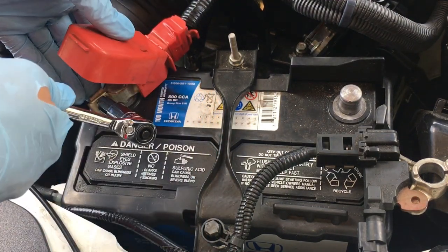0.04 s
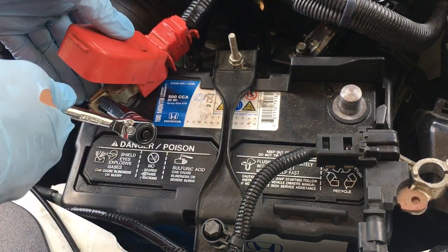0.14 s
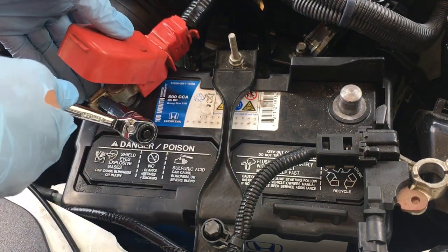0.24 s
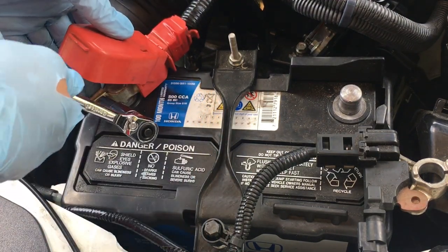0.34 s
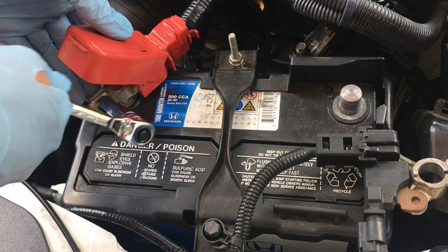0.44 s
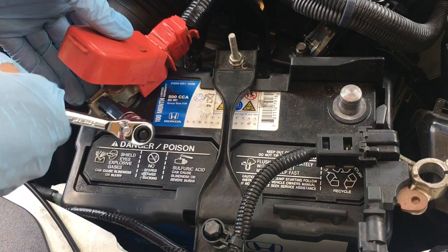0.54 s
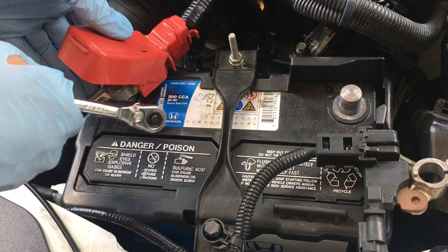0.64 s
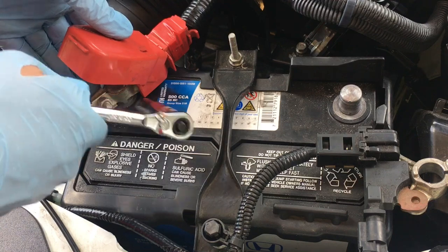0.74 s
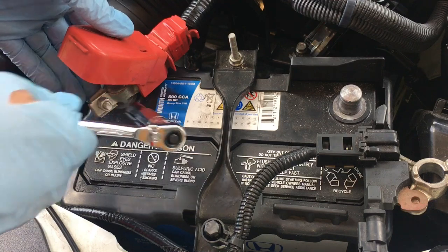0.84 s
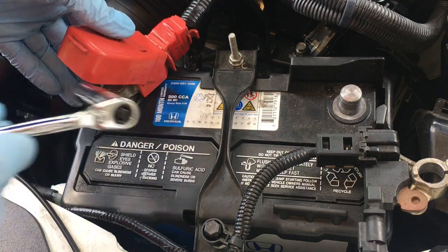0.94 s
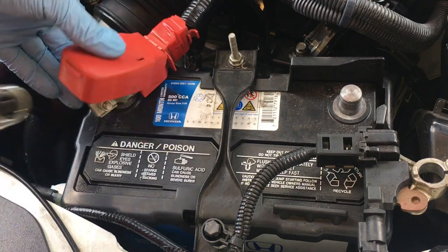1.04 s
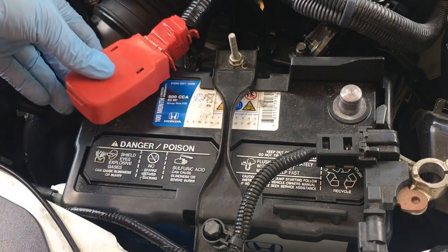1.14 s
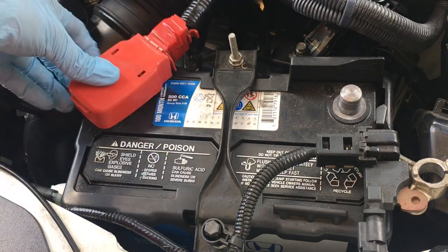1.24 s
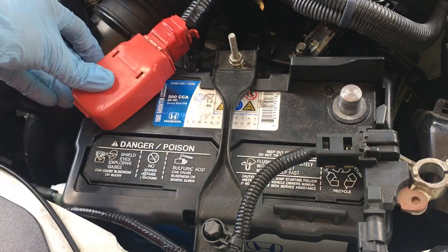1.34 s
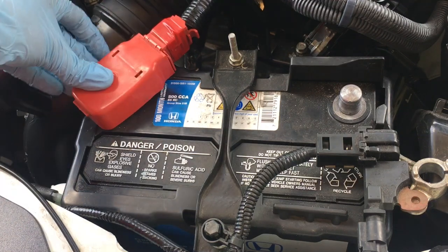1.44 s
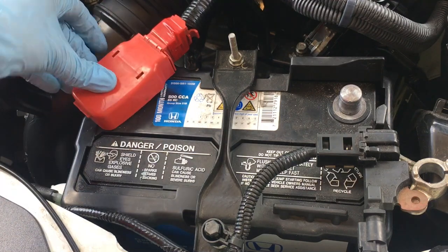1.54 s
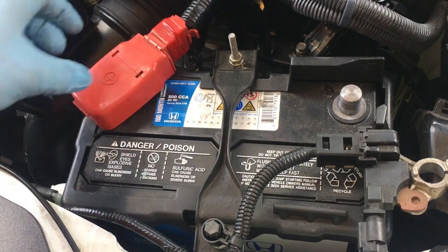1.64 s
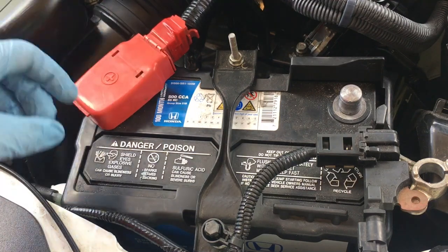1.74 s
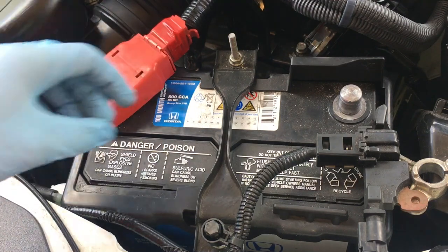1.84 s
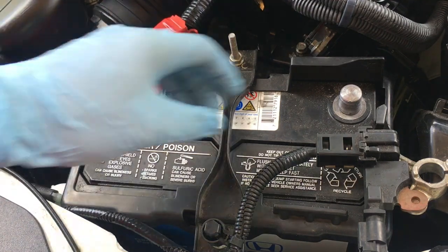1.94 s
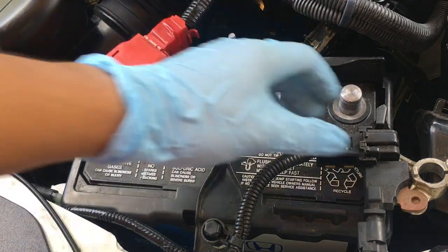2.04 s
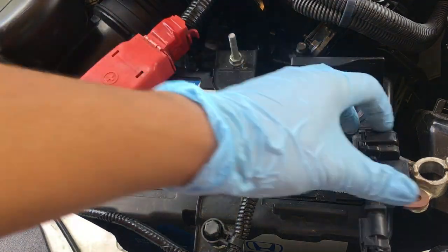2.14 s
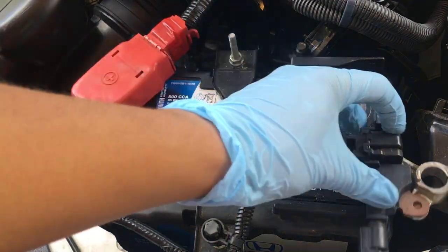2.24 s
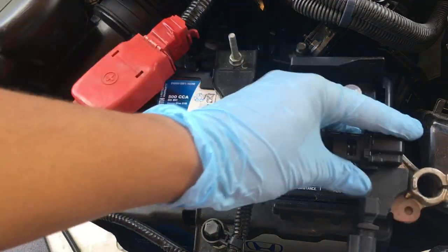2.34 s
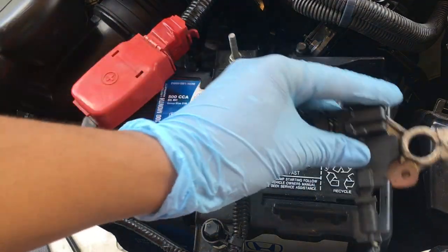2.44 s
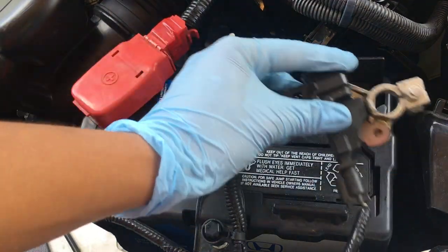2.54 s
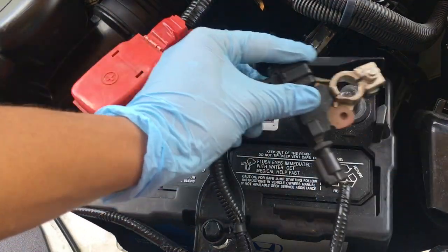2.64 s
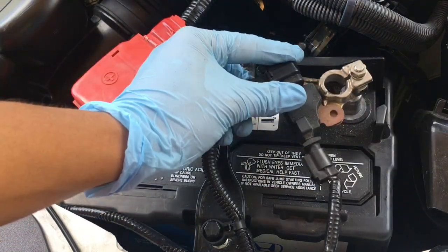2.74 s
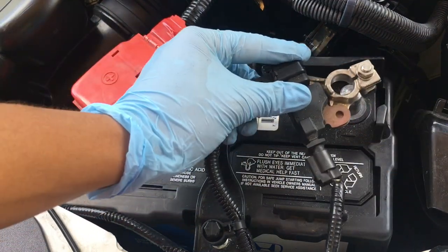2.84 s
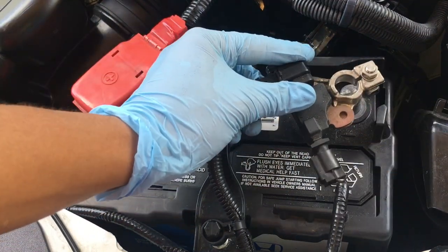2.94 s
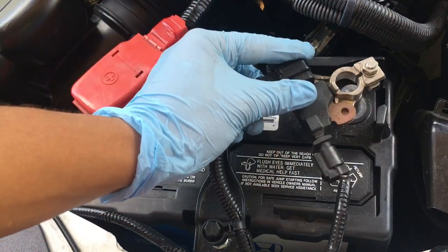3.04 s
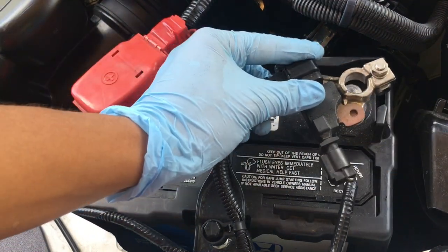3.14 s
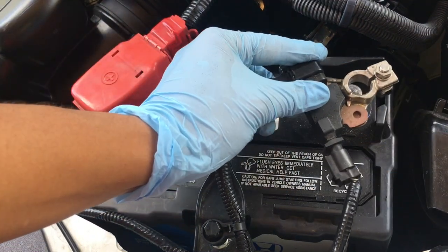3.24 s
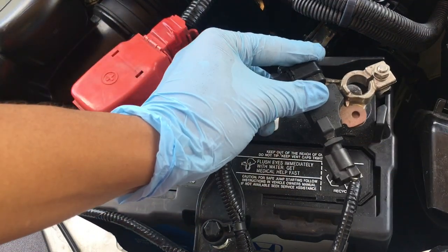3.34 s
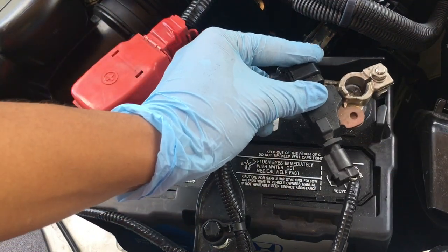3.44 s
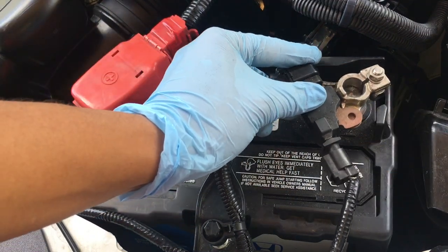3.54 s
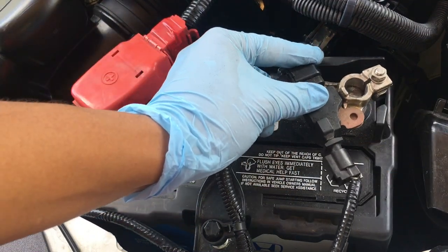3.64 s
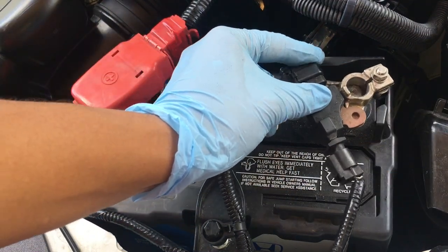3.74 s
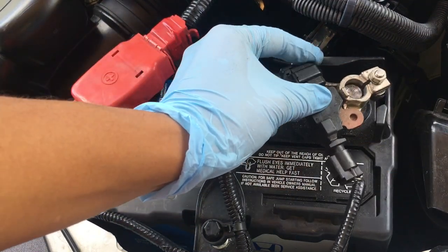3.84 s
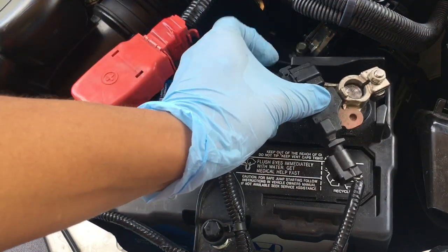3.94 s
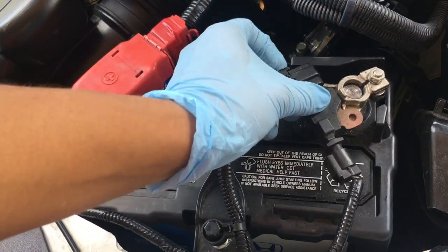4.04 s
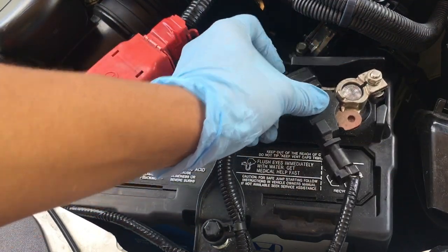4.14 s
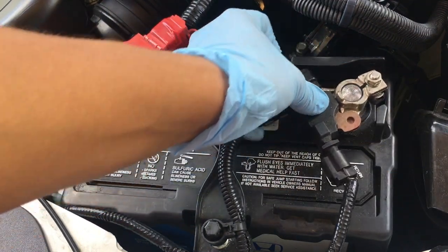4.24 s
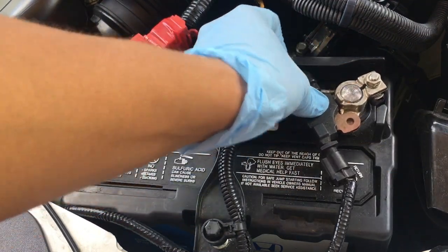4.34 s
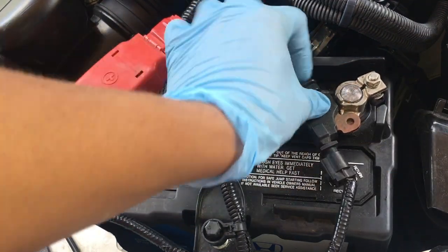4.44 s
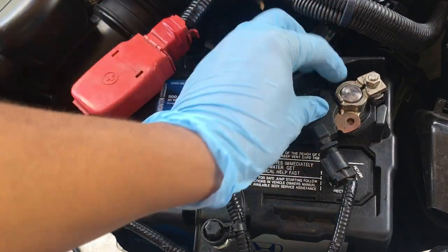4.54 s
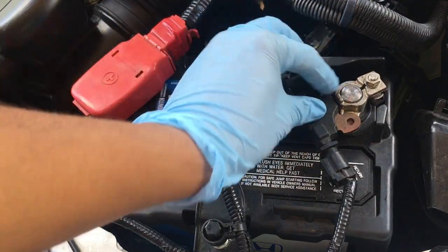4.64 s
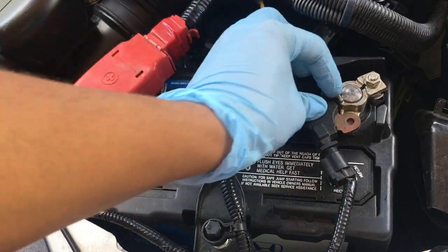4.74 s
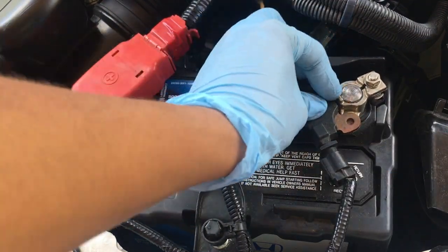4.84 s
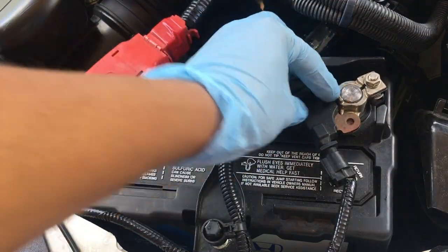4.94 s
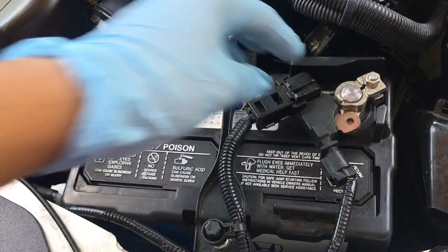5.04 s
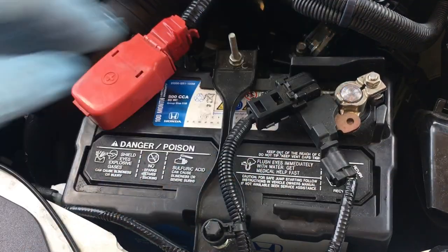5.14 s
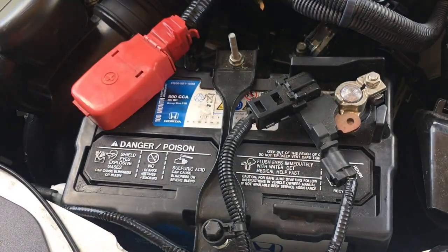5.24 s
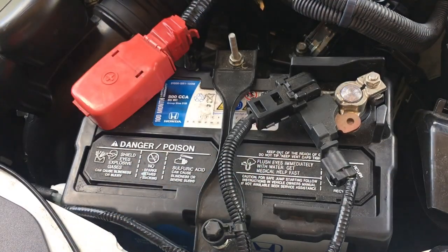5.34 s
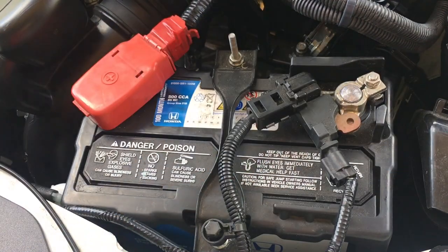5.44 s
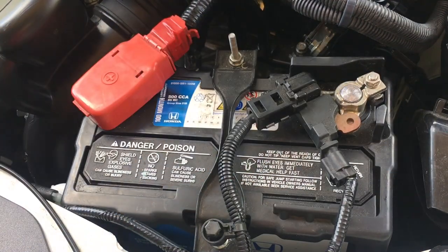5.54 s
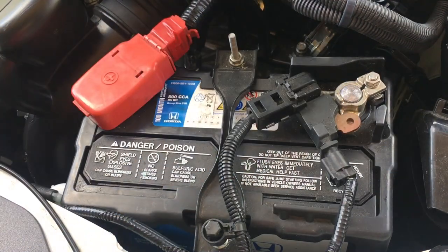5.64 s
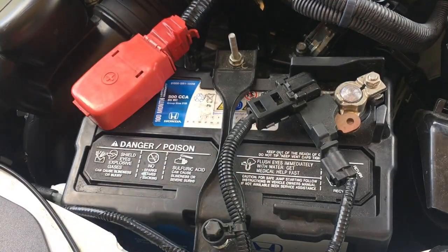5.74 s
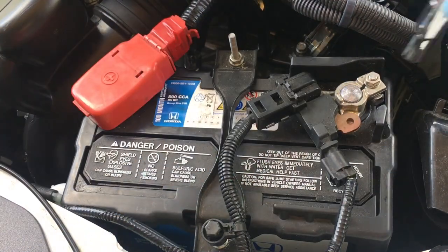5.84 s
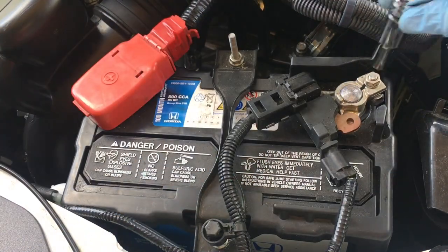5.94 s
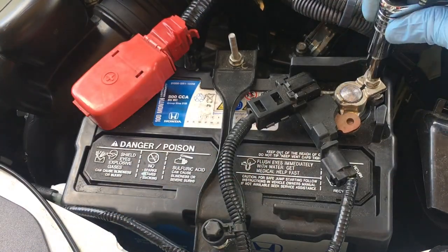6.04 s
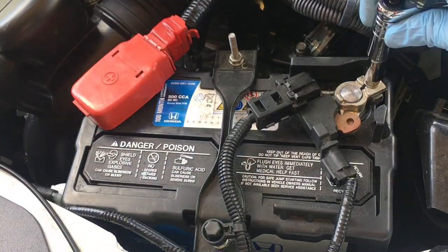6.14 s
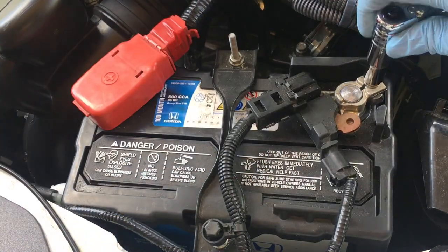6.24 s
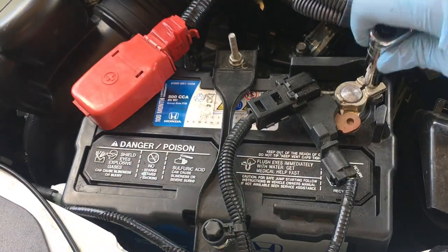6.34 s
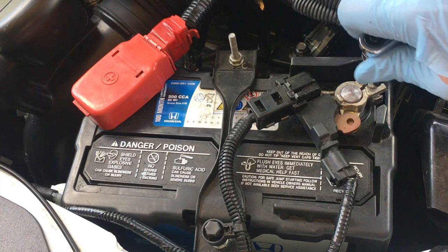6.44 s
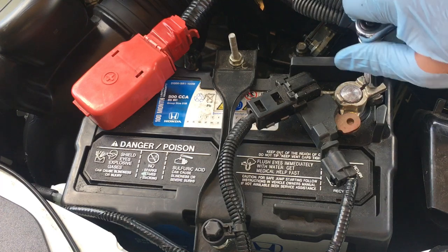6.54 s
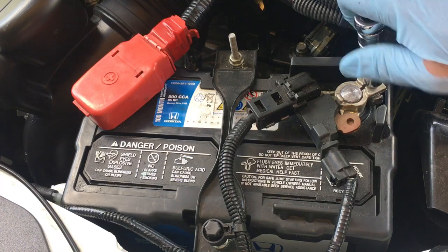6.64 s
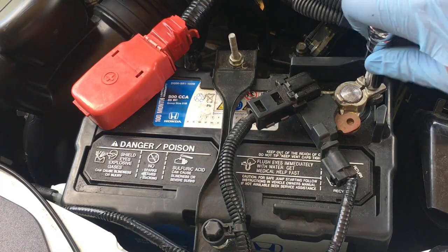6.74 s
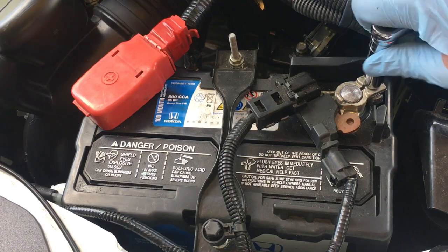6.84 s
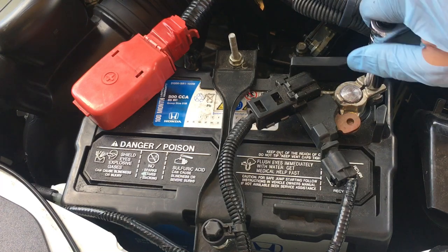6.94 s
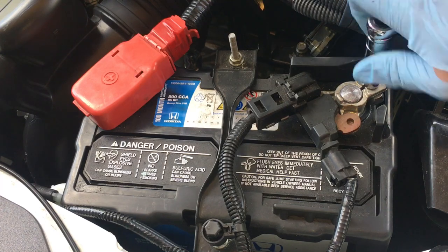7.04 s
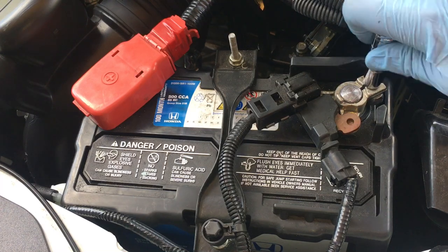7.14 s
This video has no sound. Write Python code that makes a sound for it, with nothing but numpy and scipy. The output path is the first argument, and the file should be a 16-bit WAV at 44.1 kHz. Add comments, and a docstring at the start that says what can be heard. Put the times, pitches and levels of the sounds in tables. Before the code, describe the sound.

Close sound of hands working on a car battery in an open engine bay. A faint low hum and soft rubber-glove rustle run throughout. A spanner lifts off with a clack, then a plastic cover snaps shut, by far the loudest event. Cable and clamp parts knock and tick as the clamp is set on its post. Small metal taps follow, then a ratchet clicks in two fast runs.

```python
"""A distant low hum with a faint whine is heard first, under a soft rustle of gloves; both last throughout.
Hands work on a car battery in an open engine bay: a spanner is lifted off, a plastic cover snaps shut,
a clamp is set on its post, and a socket ratchet clicks back in two short runs.
Hum and rustle are shaped noise, the hum with two sine tones; slides and ticks are noise through resonances;
knocks are forces ringing modes; cover and ratchet add bursts of shaped noise to such rings.
A short dense tail gives the reflections of the bay."""
import sys
import numpy as np
from scipy import signal
from scipy.fft import rfft, irfft
from scipy.io import wavfile

SR = 44100
rng = np.random.default_rng(int(sys.argv[2]) if len(sys.argv) > 2 else 0)


def store_wav(level_fs):
    """Save 16-bit WAV to argv[1]."""
    pcm = np.round(np.clip(np.atleast_2d(level_fs), -1, 1) * 32767)
    wavfile.write(sys.argv[1], SR, pcm.T.astype(np.int16))


N = 317520   # samples, 7.2 s


def from_db(db):
    """Logarithmic level: decibels to amplitude gain."""
    return 10 ** (np.asarray(db) / 20)


def rms_one(x):
    """Normalisation by mean square: scales the signal to rms 1."""
    return x / np.sqrt(np.mean(x ** 2) + 1e-20)


def in_time(rows):
    """Linear interpolation: a (t/s, value) curve at every sample."""
    s, value = np.transpose(rows)
    return np.interp(np.arange(N) / SR, s, value)


def drift(rate_hz):
    """Low-passed chance of rms 1: coarse noise through two equal one-pole filters."""
    step = 40   # samples between coarse points
    pole = np.exp(-2 * np.pi * rate_hz * step / SR)
    settling = 2000   # coarse points discarded while the filter settles
    noise = rng.standard_normal(N // step + settling + 2)
    slow = signal.lfilter([1], [1, -2 * pole, pole * pole], noise)[settling:]
    return np.interp(np.arange(N) / step, np.arange(len(slow)), rms_one(slow))


def coloured(spectrum, size=N):
    """Spectral shaping: white noise weighted by (f/Hz, level/dB) points on a log frequency axis, rms 1."""
    hz = np.arange(size // 2 + 1) * SR / size + 1   # +1 keeps the logarithm finite
    point_hz, point_db = np.transpose(spectrum)
    gain = from_db(np.interp(np.log(hz), np.log(point_hz), point_db))
    return rms_one(irfft(rfft(rng.standard_normal(size)) * gain, size))


def fading(t60):
    """Exponential decay: a contact builds up quickly and dies away, in an envelope 0.25 s long."""
    t = np.arange(SR // 4) / SR
    t60 = max(t60, 1e-3)
    rise = np.minimum(t / (0.022 * t60), 1)
    return rise * from_db(-60 * t / t60) + 1e-18


def contact(t60, blow=0):
    """Impulsive excitation: a contact force of a first blow and a fading burst of noise."""
    force = rng.standard_normal(SR // 4) * fading(t60)
    force[0] += blow
    return force


def struck(force, modes, gains_db):
    """Modal superposition: the force rings each damped resonance, scaled to that mode's peak."""
    out = 0
    for (hz, level_db, t60), gain_db in zip(modes, gains_db):
        radius = from_db(-60 / (t60 * SR))
        angle = 2 * np.pi * hz / SR
        ring = signal.lfilter([1, 0, -1], [1, -2 * radius * np.cos(angle), radius * radius], force)
        out = out + from_db(level_db + gain_db) * ring / np.max(np.abs(ring))
    return out


def add(track, s, peak_db, sound):
    """Linear superposition: lays a sound on the track at its time and peak level."""
    at = round(s * SR)
    part = sound[:N - at]
    track[at:at + len(part)] += from_db(peak_db) * part / np.max(np.abs(sound))


def hum():
    """Broadband rumble with tonal components: far machinery, with two faint tones wavering in pitch and level."""
    # spectrum of the rumble: f/Hz, relative level/dB per Hz
    rumble_tone = [(13, -60), (28, -34), (45, -5.5), (63, 1), (123, -4), (170, -12.5), (300, -12),
                   (400, -18), (460, -25.5), (580, -22.5), (1300, -28), (2900, -39), (6400, -45),
                   (10500, -61), (16500, -59)]
    # wavering tones: mean f/Hz, central rms level/dB
    whines = [(121, -58.5), (933, -68.5)]
    out = from_db(-44.5) * coloured(rumble_tone)
    for hz, level_db in whines:
        phase = 2 * np.pi * hz * np.cumsum(1 + 0.00196 * drift(1.67)) / SR
        level = from_db(level_db + 2.2 * drift(1.2))
        out = out + np.sqrt(2) * level * np.sin(phase)   # root 2: rms to peak of a sine
    return out


def bay(x):
    """Diffuse reverberation: metal and plastic of the engine bay reflect a short, dull, dense tail."""
    t60_s, build_up_s, cut_hz = .16, 0.027, 5000
    t = np.arange(SR // 3) / SR
    tail = rng.standard_normal(len(t)) * from_db(-60 * t / t60_s) * np.minimum(t / build_up_s, 1)
    tail = signal.lfilter(*signal.butter(1, cut_hz, fs=SR), tail)
    unit_energy_tail = tail / np.sqrt(np.sum(tail ** 2))
    return signal.fftconvolve(x, unit_energy_tail)[:N]


def rustle():
    """Friction noise: rubbing flutters, swells smoothly and crackles at random as the rubber unsticks."""
    # slow level of the rubbing before flutter and crackle: t/s, level/dB
    slow_level = [(0, -69.5), (.45, -70.5), (.62, -62.5), (1.03, -63.5), (1.07, -70.5), (1.5, -59.5),
                  (2.05, -69.5), (2.42, -60.5), (2.7, -72), (3.55, -70), (3.85, -59.5), (4.1, -64.5),
                  (4.9, -67), (5.9, -68), (6.4, -67), (6.6, -62), (7.2, -60)]
    # spectrum of the rubbing: f/Hz, relative level/dB per Hz
    rub_tone = [(590, -38), (1000, -6), (2380, -3), (2940, -13), (3720, -7), (5000, -14.5), (6200, -8.5),
                (10400, -15.5), (13000, -15), (15900, -22), (16500, -67)]
    # swells of the soft noise: glove or sleeve brushes, and a hiss under the first ratchet run:
    # t/s of the loudest moment, added level/dB there, length/s
    swells = [(1.82, -57, 0.08), (2.258, -78, 0.05), (2.644, -67, 0.065), (2.788, -61, 0.051),
              (3.905, -60, 0.063), (3.994, -53.5, .05), (4.219, -56.5, 0.045), (4.352, -58.5, .07),
              (4.5, -55.5, 0.12), (4.641, -63.5, 0.072), (4.79, -62, 0.084), (5.046, -72, 0.19),
              (5.368, -61, 0.063), (5.453, -66, 0.13), (5.743, -70, 0.16), (6.125, -57.5, 0.29),
              (6.518, -43.5, 0.18)]
    crackles_per_s, crackle_t60_s, crackle_max_db = 18, .012, 8   # tallest pop, relative to the rubbing

    t = np.arange(N) / SR
    level = from_db(in_time(slow_level))
    for s, level_db, length in swells:
        rise_and_fall = np.cos(np.pi * np.clip((t - s) / length, -.5, .5)) ** 2
        level = level + from_db(level_db) * rise_and_fall
    happens = rng.random(N) < crackles_per_s / SR
    pops = happens * from_db(crackle_max_db) * rng.random(N)
    crackle = 1 + signal.lfilter([1], [1, -from_db(-60 / (crackle_t60_s * SR))], pops)
    flutter = from_db(0.87 * drift(61.0))
    return level * crackle * flutter * coloured(rub_tone)


def slides():
    """Resonant filtering: friction noise swells and fades through the resonance of the part that slides."""
    # short slides: t/s of the start, length/s, centre f/Hz, bandwidth/Hz, rms level/dB before the fades
    rubs = [(0.741, 0.036, 1250, 1280, -45), (1.144, 0.1, 2150, 400, -60.5),
            (1.294, 0.046, 1942, 200, -48.5), (1.325, 0.016, 6000, 3000, -58),
            (2.393, 0.056, 650, 300, -44), (2.413, .022, 11800, 500, -56), (4.618, 0.28, 1490, 1770, -59.5),
            (5.649, 0.047, 1500, 1480, -56), (5.996, 0.1, 5870, 1190, -61.5),
            (6.064, 0.11, 3930, 1200, -55)]
    out = np.zeros(N)
    for s, length, hz, width_hz, level_db in rubs:
        at, size = round(s * SR), round(length * SR)
        noise = rng.standard_normal(SR // 2)
        rub = signal.lfilter(*signal.iirpeak(hz, hz / width_hz, SR), noise)[-size:]   # settled end
        out[at:at + size] += from_db(level_db) * rms_one(rub) * signal.windows.tukey(size, .5)
    return out


def ticks():
    """Broadband contact with one resonance: a bright crack has a broad peak where the small part rings."""
    # small ticks of metal parts, cable and glove: t/s, peak level/dB, f/Hz of the ring,
    # level/dB of the broad crack's gain relative to the ring's
    small_hits = [(.628, -24, 11100, -8), (0.7482, -24.5, 8650, -23), (.765, -40, 3820, -6),
                  (1.804, -50, 6530, -8), (1.983, -47, 4100, -3), (2.2396, -41.5, 6000, -17),
                  (2.337, -42, 4500, -6), (2.365, -35, 11900, -16), (2.3778, -30, 4270, -19),
                  (2.386, -24, 12600, -3), (2.4346, -35.5, 11900, -13), (2.4424, -42, 3860, -14),
                  (2.4485, -32.5, 6400, -8), (2.4567, -30.5, 3900, -4), (2.748, -47, 3950, -17),
                  (2.7892, -34, 8140, -2), (2.831, -33.5, 6750, -8), (3.0332, -46, 4440, -4),
                  (3.6303, -29.5, 6170, -9), (3.852, -40.5, 6890, 7), (3.8843, -23.5, 8700, 7),
                  (3.897, -30, 6660, 1), (3.9085, -30.5, 7700, 1), (4.0004, -40, 5210, -21),
                  (4.474, -44, 3520, -15), (4.5085, -35.5, 3680, -11), (5.468, -37, 5570, 0),
                  (5.7305, -44.5, 3770, -3), (6.1275, -34, 3860, -28), (6.144, -23.5, 6250, 3),
                  (6.1798, -32, 6240, -9), (6.191, -39, 3820, -11), (6.2814, -31.5, 12000, -8),
                  (6.7894, -33.5, 6000, 1), (6.8508, -34.5, 5160, -20)]
    out = np.zeros(N)
    bright = signal.butter(2, [2300, 13500], "band", fs=SR, output="sos")
    for s, peak_db, hz, crack_db in small_hits:
        force = contact(.017)
        ring = signal.lfilter(*signal.iirpeak(hz, 4.0, SR), force)
        add(out, s, peak_db, signal.sosfilt(bright, from_db(crack_db) * force + ring))
    return out


def knocks():
    """Modal excitation by position: where the slightly soft blow lands decides which modes speak most."""
    # knocks on the battery case and clamp: t/s, peak level/dB, f/Hz favoured by the blow
    blows = [(0.6307, -38, 1910), (0.676, -41, 2570), (0.732, -39, 1500), (0.7483, -16, 1820),
             (.754, -30.5, 820), (.766, -26.5, 1800), (.771, -30, 820), (2.337, -44, 1750),
             (2.378, -32, 2160), (2.3858, -16, 1140), (2.392, -21, 1250), (2.421, -33, 640),
             (2.458, -39.5, 2320), (2.784, -34, 1280), (3.631, -39.5, 730), (3.8897, -18.5, 1210),
             (3.899, -27, 905), (4.055, -38, 1030), (4.221, -44, 1050), (4.507, -36, 1714),
             (5.133, -37, 1860), (5.354, -37, 734), (5.648, -30, 1270), (6.129, -26.5, 2300),
             (6.1294, -23.5, 980), (6.154, -34.5, 940), (6.183, -31.5, 3060), (6.228, -34, 2140),
             (6.285, -31, 2840), (6.51, -35, 880), (6.79, -30.5, 2760)]
    # modes of the battery case: f/Hz, relative level/dB, t60/s
    case = [(450, -12, .035), (590, -3, .045), (730, -2, .04), (870, -3, .035), (1010, -2, .035),
            (1140, 0, .04), (1400, -4, .035), (1550, -3, .03), (1750, -2, .025), (1950, -3, .02),
            (2280, -2, .02), (2560, -6, .018), (3140, -5, .012), (3700, -8, .01)]
    out = np.zeros(N)
    mode_hz = np.array(case)[:, 0]
    for s, peak_db, hz in blows:
        octaves_away = np.abs(np.log2(mode_hz / hz))
        gains_db = -16 * octaves_away + rng.normal(0, 1.5, len(case))
        contact_t60_s = 0.025 * (hz / 1000) ** -0.5   # higher knocks have shorter contacts
        sound = struck(contact(contact_t60_s, blow=5), case, gains_db)
        softened = signal.lfilter(*signal.butter(2, 1.5 * hz, fs=SR), sound)
        add(out, s, peak_db, softened)
    return out


def cover():
    """Fixed modes of a hollow body: every snap rings the same set, under a dry crack and a loose rattle."""
    # plastic cover flexing and snapping: t/s, peak level/dB, contact t60/s
    snaps = [(1.325, -41, 0.02), (1.357, -32, 0.0044), (1.381, -45, 0.018), (1.399, -12.5, 0.006),
             (1.4031, -2, 0.022), (1.698, -36, 0.0067)]
    # modes of the cover: f/Hz, relative level/dB, t60/s
    cover_modes = [(600, -21, .04), (870, -12, .045), (1400, -9, .05), (1530, -11, .06), (1800, -6, .015),
                   (1930, 0, .016), (2200, -7, .02), (2600, -13, .02), (2920, -15, .025), (3750, -11, .015),
                   (4350, -14, .015)]
    # spectrum of the crack: f/Hz, relative level/dB per Hz
    crack_tone = [(500, -23), (2000, -10.5), (5000, -39), (11000, -21), (16000, -52)]
    out = np.zeros(N)
    for s, peak_db, contact_s in snaps:
        force = contact(contact_s, blow=1.3)
        rings = struck(force, cover_modes, rng.normal(0, 1, len(cover_modes)))
        crack_then_rattle = fading(2 * contact_s) + from_db(-19.0) * fading(0.094)
        crack = coloured(crack_tone, size=SR // 4) * crack_then_rattle
        add(out, s, peak_db, rings + from_db(-7) * crack)
    return out


def ratchet():
    """High modal density: each pawl drop is a broad crack over a few head rings, its colour and strength
    scattered at random from click to click."""
    # the pawl drops over a ratchet tooth: t/s
    pawl_drops = [6.4327, 6.4456, 6.4651, 6.4758, 6.4819, 6.4942, 6.4995, 6.5041, 6.5116, 6.5215, 6.5284,
                  6.5323, 6.5363, 6.5418, 6.5506, 6.5563, 6.5671, 6.5725, 6.5771, 6.5813, 6.5911, 6.598,
                  6.6068, 6.616, 6.6228, 6.6321, 6.6503, 6.8829, 6.9457, 6.9571, 6.961, 6.9697, 6.9728,
                  6.9824, 6.9976, 7.0086, 7.0202, 7.0292]
    # strength along the two back-swings of the handle: t/s, peak level/dB before scatter
    swing = [(6.43, -19), (6.465, -14), (6.512, -13), (6.526, -21), (6.55, -19), (6.557, -14), (6.65, -13),
             (6.88, -21), (6.945, -19), (6.97, -17), (7.03, -15.5)]
    # modes of the steel head: f/Hz, relative level/dB before scatter, t60/s
    head = [(3460, -22.5, 0.075), (5870, -11, 0.016), (6110, -3, 0.018), (6900, -6.5, 0.019),
            (8700, -20, 0.0089), (9030, -20, 0.018), (8870, 5, 0.0042), (10960, -0.5, 0.016)]
    # mean spectrum of the crack: f/Hz, relative level/dB per Hz
    click_tone = [(470, -38), (800, -12.5), (1510, -10), (3610, -7.5), (6070, 1), (7530, -7), (9220, 4.5),
                  (13800, -3.5), (15300, 1.5), (16500, -6.5)]
    level_scatter_db, colour_scatter_db, ring_scatter_db = 1.0, 2.5, 5   # standard deviations per click

    out = np.zeros(N)
    sharp_then_chatter = fading(.005) + from_db(-8) * fading(.022) + from_db(-31) * fading(.2)
    for s in pawl_drops:
        peak_db = np.interp(s, *np.transpose(swing)) + level_scatter_db * rng.standard_normal()
        tone = [(hz, db + colour_scatter_db * rng.standard_normal()) for hz, db in click_tone]
        crack = coloured(tone, size=SR // 4) * sharp_then_chatter
        rings = struck(contact(.004), head, rng.normal(0, ring_scatter_db, len(head)))
        add(out, s, peak_db, crack + from_db(-11) * rings)
    return out


def scene():
    """Direct and diffuse sound: all hits and slides share the bay; rustle and hum are already diffuse."""
    near = ratchet() + cover() + knocks() + ticks() + slides()
    reflections = from_db(-24) * bay(near)
    return (near + reflections + rustle() + hum())[None]


def record(dry):
    """Band limitation: a steep elliptic low-pass cuts the top above 15.8 kHz."""
    ripple_db, stop_db = .5, 75
    top_cut = signal.ellip(10, ripple_db, stop_db, 15800, fs=SR, output="sos")
    return signal.sosfilt(top_cut, dry)


dry = scene()
out = record(dry)
store_wav(out)
```